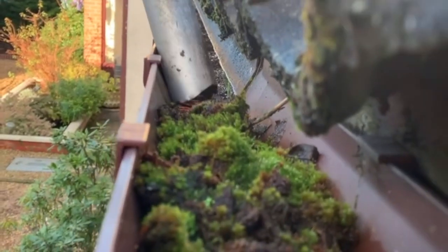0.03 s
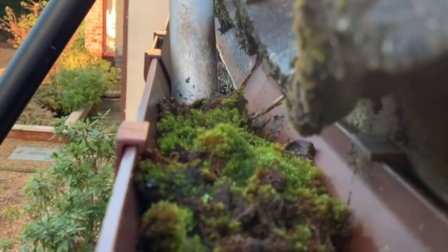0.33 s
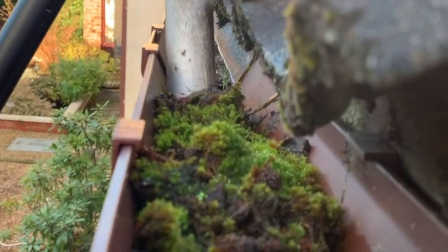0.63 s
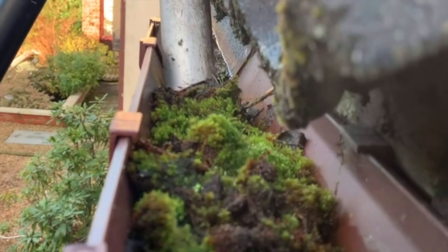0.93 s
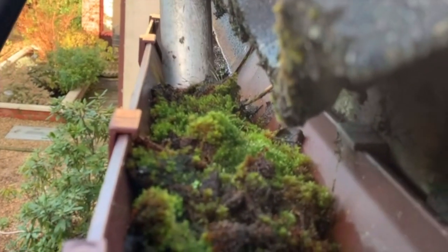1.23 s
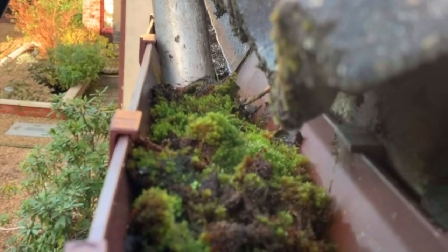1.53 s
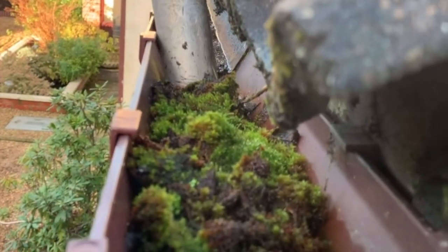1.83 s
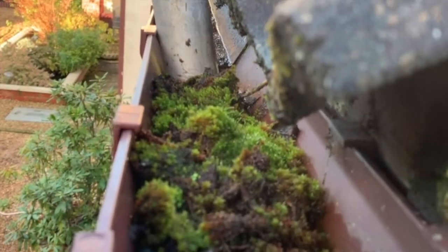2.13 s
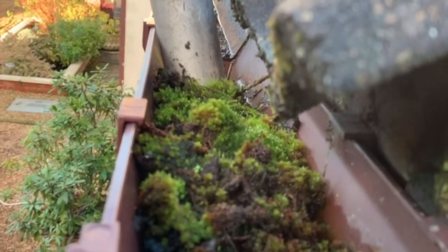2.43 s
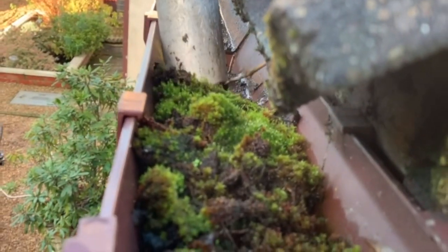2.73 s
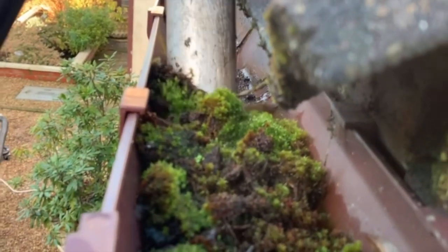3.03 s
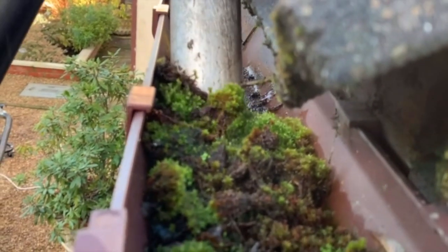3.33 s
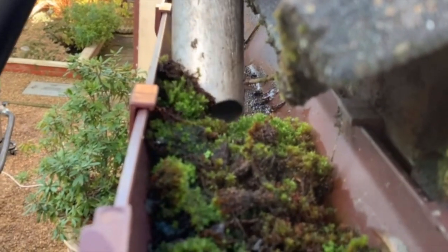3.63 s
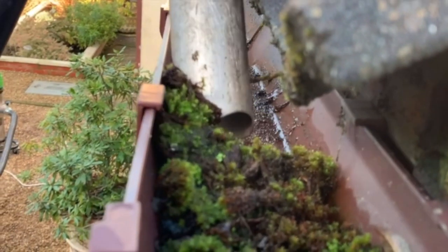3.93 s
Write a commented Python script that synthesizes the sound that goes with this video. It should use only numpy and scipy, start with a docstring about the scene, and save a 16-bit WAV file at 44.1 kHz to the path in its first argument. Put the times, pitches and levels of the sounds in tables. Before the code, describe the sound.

Vacuum nozzle sucking wet moss from a gutter, rushing steadily, then sputtering and slurping.

```python
"""Vacuuming a mossy gutter.

Air rushes freely into a close nozzle over a faint turbine whine; then moss clogs the rim, the whine
fades and the flow sputters and pops. Wet shreds squeak, the clump tears loose with a rising slurp,
lumps thump up the tube and grit ticks on the metal. Gutter and tiles add short reflections."""
import sys
import numpy as np
from scipy import signal
from scipy.fft import rfft, irfft
from scipy.io import wavfile

SR = 44100
rng = np.random.default_rng(int(sys.argv[2]) if len(sys.argv) > 2 else 0)


def unload_audio(sound):
    """Save the sound as a 16-bit wav file, at the path given as the first command line argument."""
    columns = np.transpose(np.atleast_2d(sound))
    # keep every value between -1 and 1, then stretch to whole-number steps
    steps = np.round(np.clip(columns, -1, 1) * 32767)
    wavfile.write(sys.argv[1], SR, steps.astype(np.int16))


N = 176400

# Air noise at the rim, four bands: time_s, body_db, roar_db, hiss_db, fizz_db
FLOW_LEVELS = [(0.0, -40, -26, -32.5, -43.5), (0.34, -37.5, -27, -35.5, -44.5),
               (0.41, -42, -37, -35.5, -48.5), (0.535, -44, -35.5, -35.5, -43.5),
               (0.565, -39, -27.5, -31, -38), (0.955, -38, -28.5, -34.5, -40),
               (0.985, -41, -25, -28.5, -35), (1.42, -42, -23, -30, -35), (1.502, -41, -22.5, -24.5, -25),
               (1.561, -57, -25.5, -37.5, -54), (1.768, -63, -38, -44, -57.5),
               (1.808, -45.5, -26, -32.5, -44), (1.885, -67, -36.5, -43.5, -59.5),
               (1.918, -47, -31, -41.5, -55), (2.035, -56, -42, -57.5, -68), (2.13, -58, -34, -48, -60),
               (2.191, -49.5, -29.5, -35.5, -42), (2.343, -40.5, -27.5, -35.5, -43.5),
               (2.39, -45, -34, -51, -51.5), (2.54, -51, -32, -44.5, -49), (2.62, -53, -34, -47, -54),
               (2.78, -43.5, -39, -45, -47), (2.83, -56, -44, -58.5, -59.5), (2.95, -55, -40.5, -51, -57.5),
               (3.01, -49, -25.5, -39, -45), (3.08, -39.5, -29, -33, -42.5), (3.146, -49, -29.5, -39, -41),
               (3.211, -44, -44.5, -59, -58), (3.288, -54.5, -47, -59.5, -55.5),
               (3.484, -50, -52, -55.5, -64), (3.541, -48, -38, -37, -34.5), (3.62, -53, -48, -58.5, -59.5),
               (3.92, -60, -43.5, -53, -52.5)]
# Edges between those bands: freq_hz
BAND_EDGES_HZ = [550, 2100, 7000]
# Colour within the bands, rim open / clogged / digging under moss: freq_hz, gain_db
OPEN_COLOUR = [(85, -33.5), (330, -10), (550, -8), (1030, 3.5), (1800, -7), (2450, -15.5), (2950, -11),
               (4100, -17.5), (4800, -20.5), (7600, -26), (8400, -21), (11000, -28), (12300, -26),
               (15400, -37)]
CLOGGED_COLOUR = [(85, -26), (450, -15.5), (750, -1), (1550, 4), (1800, -3.5), (2200, -22), (2900, -9.5),
                  (3700, -16.5), (7200, -30.5), (10000, -27), (12800, -30.5), (15400, -37)]
DIGGING_COLOUR = [(85, -21), (450, -3), (900, 0.5), (1500, -8), (2100, -30), (2700, -11.5), (3450, -18),
                  (4900, -24), (7000, -30.5), (9500, -21.5), (11200, -24.5), (13200, -31.5)]
# Resonances across the tube bore: freq_hz
BORE_MODES_HZ = [3097, 3976, 5490, 6580, 8510, 9860, 11900]
# Air popping through gaps in the moss: start_s, level_db, pitch_hz
AIR_POPS = [(0.561, -16.5, 886), (1.825, -15.5, 1123), (1.901, -18.5, 1220), (1.949, -17, 1300),
            (2.053, -24, 835), (2.106, -25.5, 1433), (2.605, -23, 1370), (2.655, -15.5, 1080),
            (2.678, -13.5, 788), (2.706, -19.5, 740), (2.769, -12, 747), (3.172, -21, 640),
            (3.329, -24, 750), (3.496, -25, 1020)]
# Lumps going up the tube: start_s, level_db, pitch_hz
LUMP_THUMPS = [(1.897, -25.5, 318), (2.164, -36, 155), (2.424, -28.5, 158), (2.489, -27.5, 276),
               (2.51, -29.5, 141), (3.175, -30.5, 226), (3.323, -33.5, 121.8), (3.347, -31, 97),
               (3.533, -27.5, 160), (3.555, -28.5, 174), (3.781, -33.5, 194)]
# Wet shreds squeaking through the rim: start_s, level_db, pitch_hz
SHRED_SQUEAKS = [(2.511, -34.5, 10130), (2.548, -34, 2740), (2.684, -30.5, 3000), (2.73, -33, 2675)]
# Gap resonance as the clump tears loose: time_s, pitch_hz, relative_db
SLURP_GLIDE = [(2.958, 389.4, -44), (3.004, 427.2, -28), (3.05, 482.7, -25), (3.081, 595, -24.5),
               (3.097, 499, -31), (3.127, 773, -21), (3.16, 855, -46)]
# Grit striking the rim: start_s, relative_db
GRIT_HITS = [(0.981, -7.5), (3.3858, -21.5)]
# Turbine whine through the tube: time_s, level_db
WHINE_FADE = [(1.5, -45), (2.35, -77.5)]
# Two microphone ports: freq_hz, left_minus_right_db, left_lead_rad, coherence
STEREO_PORTS = [(450, 0, 0.5, 0.99), (770, -3.5, -0.06, 0.84), (1300, -7.5, -1.34, 0.85),
                (2060, -5.5, -2, 0.37), (3000, -6.5, -5, 0.36), (5160, 6, -5, 0.27), (8640, 0, -6, 1)]


def suction(clog_s=1.559, dig_s=2.72, crossfade_s=0.11):
    """Flow at the rim: open, then clogged, then digging."""
    t = np.arange(N) / SR
    clog, dig = (np.clip((t - at_s) / crossfade_s + 0.5, 0, 1) for at_s in (clog_s, dig_s))
    free = rush(OPEN_COLOUR, flutter_db=0.67, patchy_db=0.47, grain_db=-6.5, spread_db=0, sway=0.007)
    clogged = rush(CLOGGED_COLOUR, flutter_db=1.5, patchy_db=4, grain_db=-3, spread_db=2, sway=0.049)
    digging = rush(DIGGING_COLOUR, flutter_db=0.5, patchy_db=3, grain_db=-4, spread_db=2, sway=0.084)
    return np.sqrt(1 - clog) * free + np.sqrt(clog * (1 - dig)) * clogged + np.sqrt(dig) * digging


def rush(colour, flutter_db, patchy_db, grain_db, spread_db, sway, grains_per_s=700):
    """Turbulence and crackling debris; flapping moss flutters all bands together."""
    t, hz = np.arange(N) / SR, np.fft.rfftfreq(N, 1 / SR)
    sizes = amp(spread_db * np.minimum(rng.exponential(1, N), 4))
    grains = sizes * rng.choice([-1, 1], N) * (rng.random(N) < grains_per_s / SR)
    air = rng.standard_normal(N) + amp(grain_db) * unit_rms(grains)
    air = moss_gaps(air, patchy_db, patch_hz=450, patch_s=0.04)
    spectrum = rfft(tube_bore(air, sway)) * amp(log_lookup(colour, hz))
    flutter = amp(flutter_db * wander(rate_hz=73.6))
    band_index = np.searchsorted(BAND_EDGES_HZ, hz)
    times_s, *band_levels_db = np.transpose(FLOW_LEVELS)
    out = np.zeros(N)
    for k, level_db in enumerate(band_levels_db):
        band = irfft(spectrum * (band_index == k), N)
        out += unit_rms(band * flutter) * amp(np.interp(t, times_s, level_db))
    return out


def moss_gaps(x, depth_db, patch_hz, patch_s):
    """Hollow colours come and go as gaps in the moss change shape."""
    frames = signal.stft(x, SR, nperseg=512, noverlap=384)[2]
    across = np.fft.fftfreq(frames.shape[0], SR / 512)[:, None] * patch_hz
    along = np.fft.rfftfreq(frames.shape[1], 128 / SR) * patch_s
    blur = np.exp(-np.pi * (across ** 2 + along ** 2))
    patches = np.fft.irfft2(np.fft.rfft2(rng.standard_normal(frames.shape)) * blur, frames.shape)
    gain = amp(depth_db * 2 * np.tanh(unit_rms(patches) / 2))
    return signal.istft(frames * gain, SR, nperseg=512, noverlap=384)[1][:N]


def tube_bore(x, sway, lift_db=4, width_hz=126):
    """Bore resonances; each slides by the fraction sway as moss narrows and frees the rim."""
    hz, t, frames = signal.stft(x, SR, nperseg=512)
    peaks = np.zeros(frames.shape)
    for mode_hz in BORE_MODES_HZ:
        drift = np.interp(t * SR, np.arange(N), wander(rate_hz=11))
        centre_hz = mode_hz * (1 + sway * drift)
        peaks += np.exp(-((hz[:, None] - centre_hz) / width_hz) ** 2)
    return signal.istft(frames * amp(lift_db * peaks), SR, nperseg=512)[1][:N]


def air_pockets(events, decay_s, sag, width_hz, rough=0.67, rise_s=0.0014):
    """Each burst briefly rings a pocket of air; pitch sags as it dies."""
    out, t = np.zeros(N), np.arange(SR // 8) / SR
    envelope = (1 - np.exp(-(t / rise_s) ** 2)) * np.exp(-t / decay_s)
    envelope /= envelope.max()
    glide = 1 + sag * (np.exp(-t / (2 * decay_s)) - 0.5)
    for start_s, level_db, pitch_hz in events:
        phase = 2 * np.pi * np.cumsum(pitch_hz * glide) / SR
        ring = (1 + rough * wander(width_hz, len(t))) * np.sin(phase)
        ring += rough * wander(width_hz, len(t)) * np.cos(phase)
        add(out, start_s, amp(level_db) * envelope * ring / np.hypot(1, 2 * rough))
    return out


def slurp(jitter=0.058, flutter_db=1.5, octave_db=-6.5, gain_db=-2):
    """Rough hollow note, climbing as the gap opens."""
    t = np.arange(N) / SR
    times_s, pitch_hz, relative_db = np.transpose(SLURP_GLIDE)
    glide_hz = np.interp(t, times_s, pitch_hz) * (1 + jitter * wander(rate_hz=206))
    phase = 2 * np.pi * np.cumsum(glide_hz) / SR
    note = unit_rms(np.sin(phase) + amp(octave_db) * np.sin(2 * phase))
    level_db = np.interp(t, times_s, relative_db) + gain_db + flutter_db * wander(rate_hz=100)
    return note * amp(level_db) * (t > times_s[0]) * (t < times_s[-1])


def grit(rim_hz=9950, width_hz=800, ring_s=0.0095, ring_db=-12, click_s=0.0022, click_db=-19):
    """Stones click on the metal rim; a cluster of high modes rings briefly."""
    out, t = np.zeros(N), np.arange(SR // 8) / SR
    for start_s, relative_db in GRIT_HITS:
        ring = wander(width_hz, len(t)) * np.sin(2 * np.pi * rim_hz * t) * np.exp(-t / ring_s)
        click = np.diff(rng.standard_normal(len(t) + 1)) * np.exp(-t / click_s)
        add(out, start_s, amp(relative_db) * (amp(ring_db) * ring + amp(click_db) * click))
    return out


def turbine_whine(pitch_hz=2050, waver=0.00515, flutter_db=3.5):
    """One wavering tone, fading as moss covers the rim."""
    t = np.arange(N) / SR
    phase = 2 * np.pi * np.cumsum(pitch_hz * (1 + waver * wander(rate_hz=51))) / SR
    level_db = np.interp(t, *np.transpose(WHINE_FADE)) + flutter_db * wander(rate_hz=13)
    return unit_rms(np.sin(phase)) * amp(level_db)


def gutter_echo(x, t60_s=0.074, churn_hz=160, path_count=6):
    """Short reflections off gutter and tiles, diffuse as the source churns about the rim."""
    t = np.arange(SR // 16) / SR
    tails = rng.standard_normal((path_count, len(t))) * amp(-60 * t / t60_s)
    tails /= np.linalg.norm(tails, axis=1, keepdims=True)
    weights = np.array([wander(churn_hz) for _ in tails])
    paths = signal.oaconvolve(x[None], tails, axes=1)[:, :N]
    return (paths * weights).sum(0) / np.linalg.norm(weights, axis=0)


def stereo_ports(x):
    """Each port gets the shared sound plus its own reflections, at its own gain and phase."""
    hz = np.fft.rfftfreq(2 * N, 1 / SR)
    balance_db, lead_rad, coherence = (log_lookup(STEREO_PORTS, hz, column) for column in (1, 2, 3))
    gains = np.array([amp(balance_db / 2), amp(-balance_db / 2)])
    gains /= np.sqrt(np.mean(gains ** 2, axis=0))
    shared = np.sqrt(coherence) * rfft(x, 2 * N)
    channels = []
    for response in (gains[0], gains[1] * np.exp(-1j * lead_rad)):
        diffuse = np.sqrt(1 - coherence) * rfft(gutter_echo(x), 2 * N)
        channels.append(irfft(response * (shared + diffuse))[:N])
    return np.array(channels)


def wander(rate_hz, size=N):
    """Smooth noise, rms about 1, rolling off above rate_hz."""
    hz = np.fft.rfftfreq(N, 1 / SR)
    spectrum = rfft(rng.standard_normal(N)) / (1 + (hz / rate_hz) ** 4)
    return unit_rms(irfft(spectrum, N))[:size]


def amp(db):
    """Decibels to gain."""
    return 10 ** (np.asarray(db) / 20)


def unit_rms(x):
    """Scale to rms 1."""
    return x / np.sqrt(np.mean(x ** 2) + 1e-20)


def log_lookup(points, hz, column=1):
    """Interpolate a table column over log frequency."""
    table = np.array(points, float)
    return np.interp(np.log(hz + 1), np.log(table[:, 0]), table[:, column])


def add(mix, start_s, sound):
    """Mix a sound in at start_s."""
    part = mix[max(round(start_s * SR), 0):][:len(sound)]
    part += sound[:len(part)]


def scene(echo_db=-13):
    """Nozzle sounds reach two ports, directly and off the gutter; the whine sits centred."""
    nozzle = moss_gaps(suction(), depth_db=3, patch_hz=222, patch_s=0.22) + slurp() + grit()
    nozzle += air_pockets(AIR_POPS, decay_s=0.0041, sag=0.26, width_hz=276)
    nozzle += air_pockets(SHRED_SQUEAKS, decay_s=0.0105, sag=0.13, width_hz=350)
    nozzle += air_pockets(LUMP_THUMPS, decay_s=0.0087, sag=0.22, width_hz=177)
    in_gutter = (nozzle + amp(echo_db) * gutter_echo(nozzle)) / np.hypot(1, amp(echo_db))
    return turbine_whine() + stereo_ports(in_gutter)


def record(dry, low_hz=55, high_hz=15600):
    """Cut deep bass and top treble."""
    highpass = signal.butter(3, low_hz, "high", fs=SR, output="sos")
    lowpass = signal.firwin(511, high_hz, window=("kaiser", 9), fs=SR)
    return signal.oaconvolve(signal.sosfilt(highpass, dry), lowpass[None], "same")


dry = scene()
out = record(dry)
unload_audio(out)
```